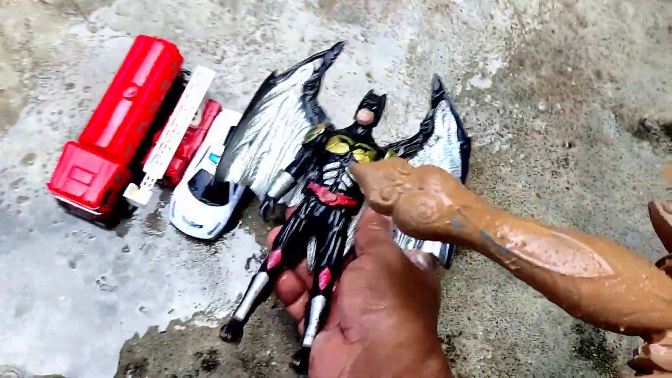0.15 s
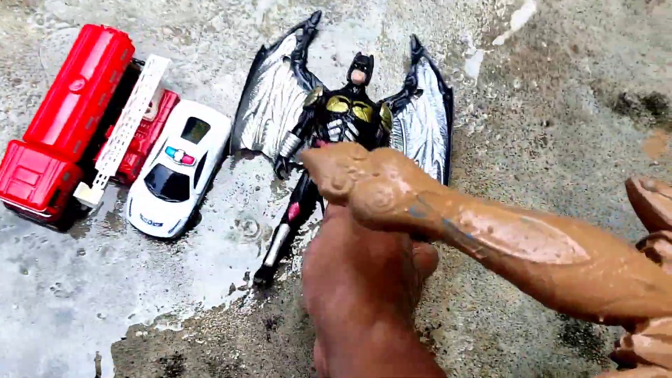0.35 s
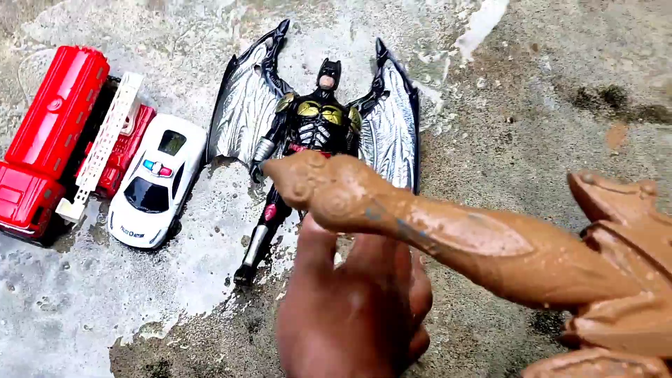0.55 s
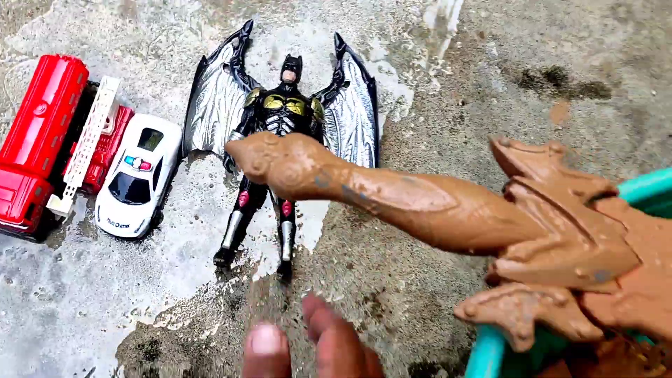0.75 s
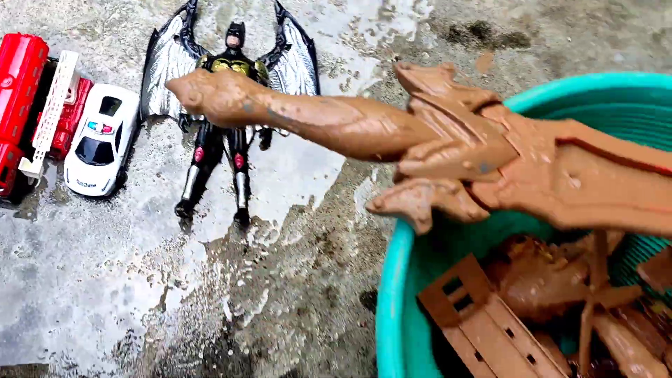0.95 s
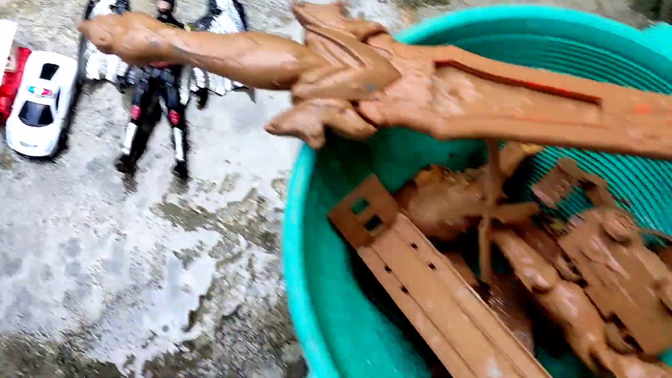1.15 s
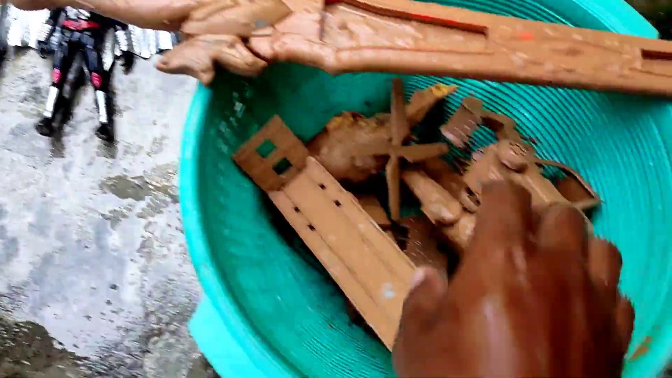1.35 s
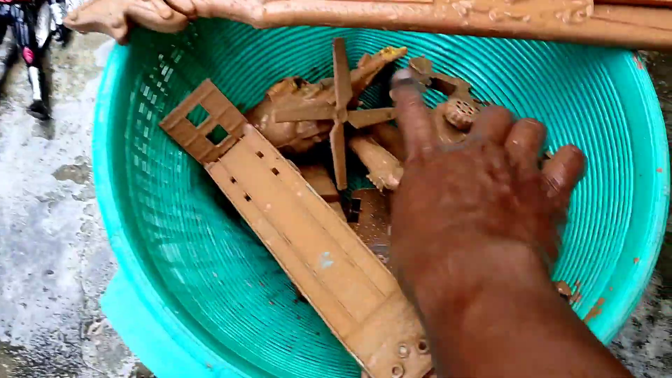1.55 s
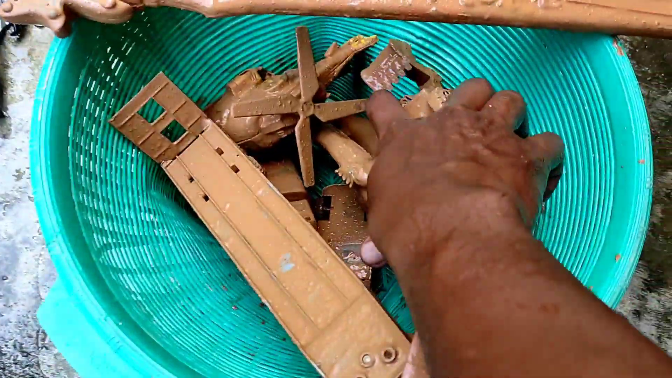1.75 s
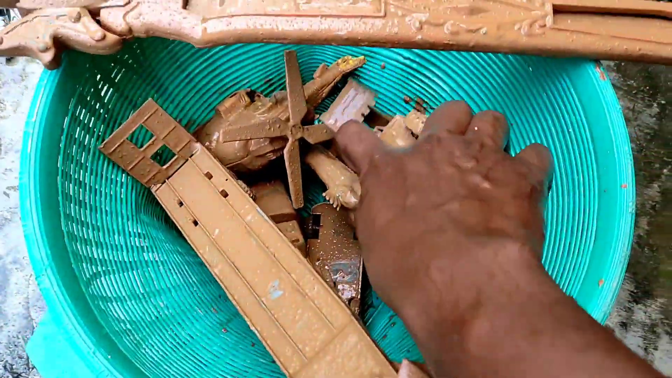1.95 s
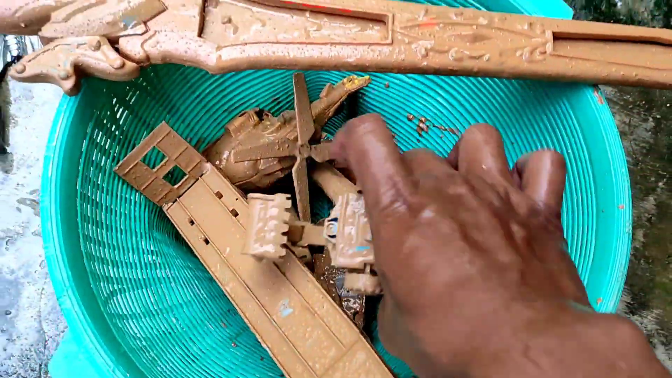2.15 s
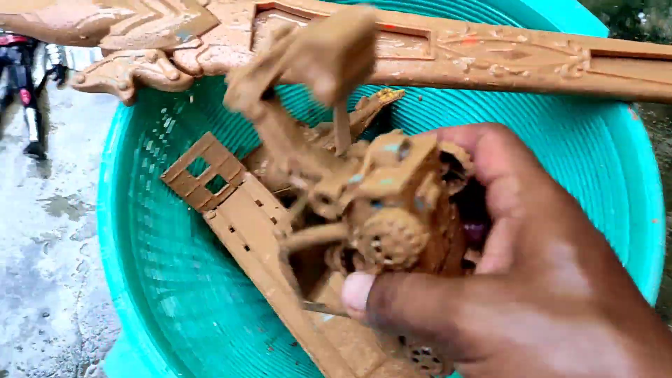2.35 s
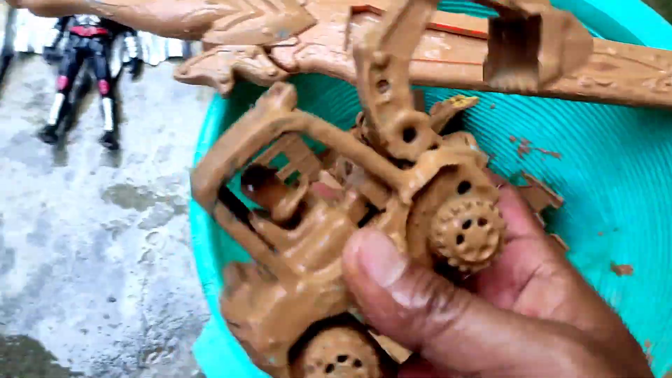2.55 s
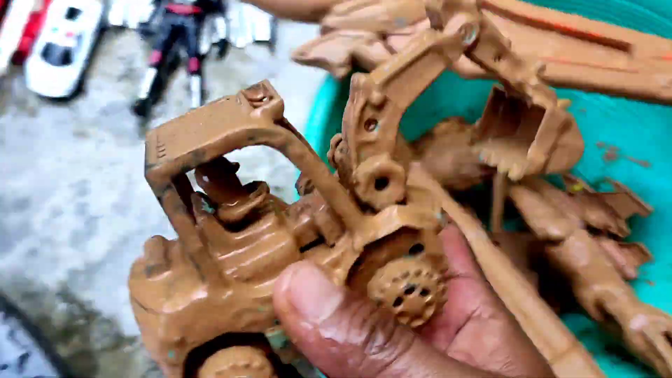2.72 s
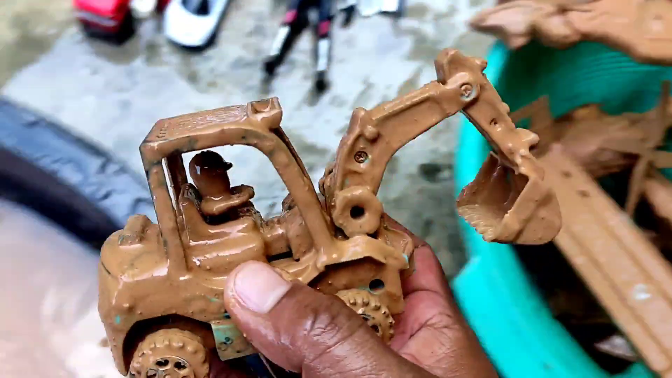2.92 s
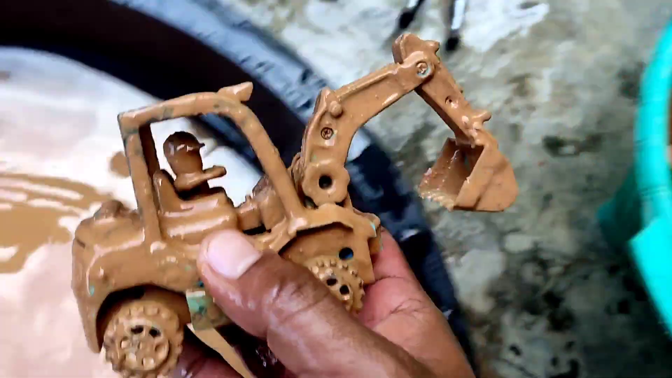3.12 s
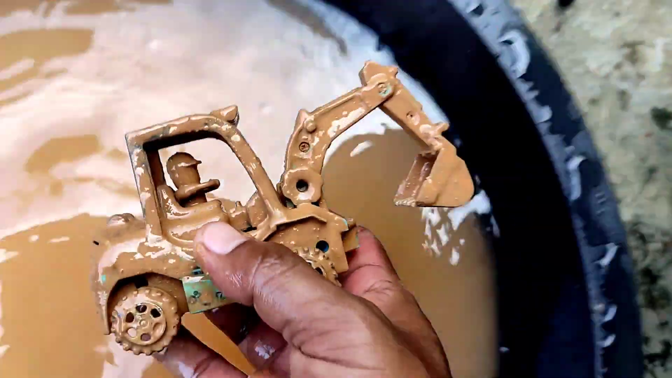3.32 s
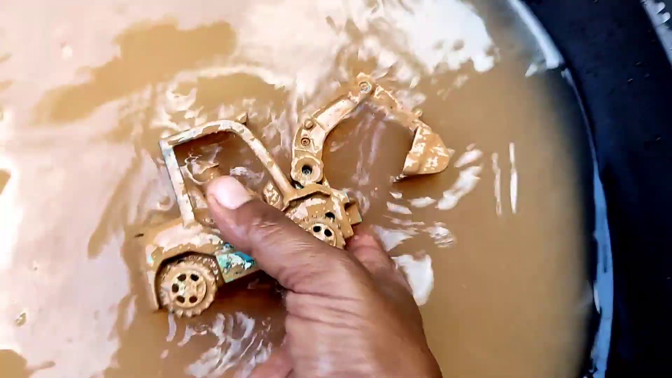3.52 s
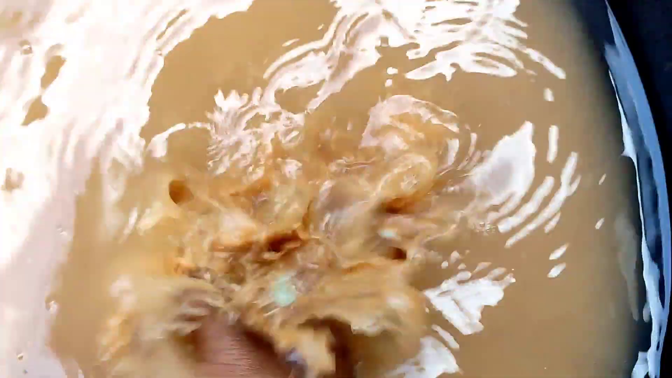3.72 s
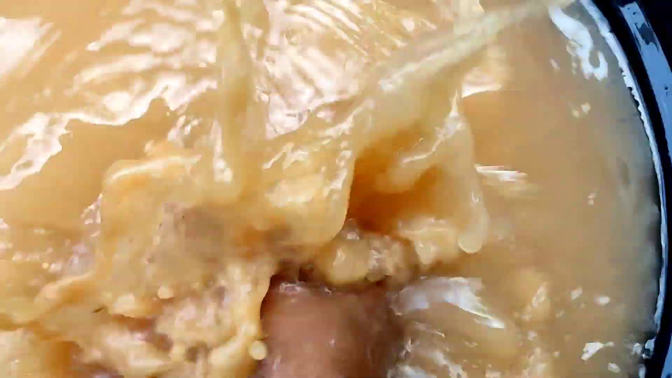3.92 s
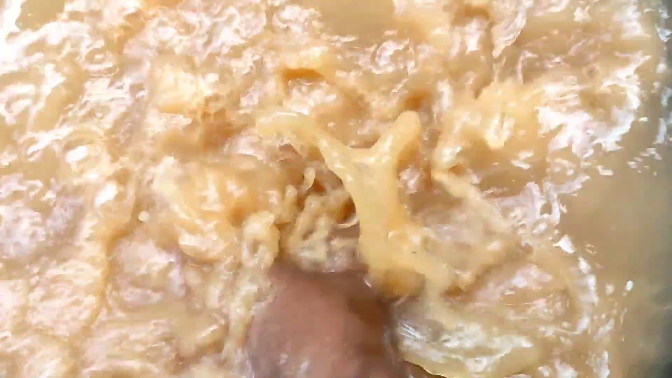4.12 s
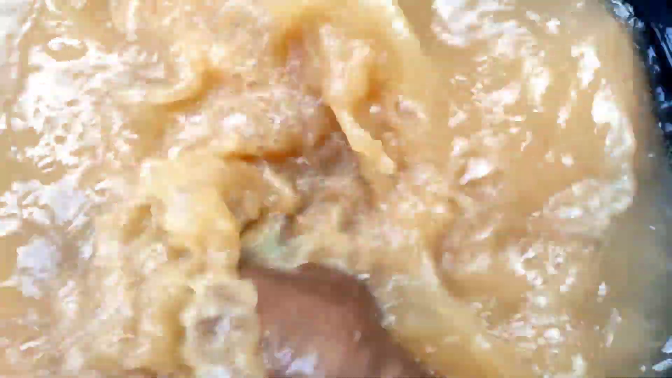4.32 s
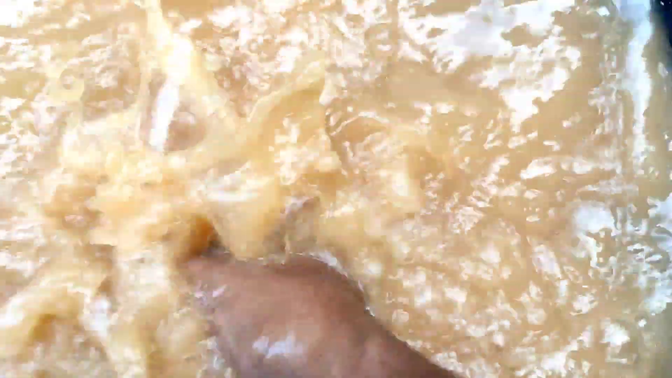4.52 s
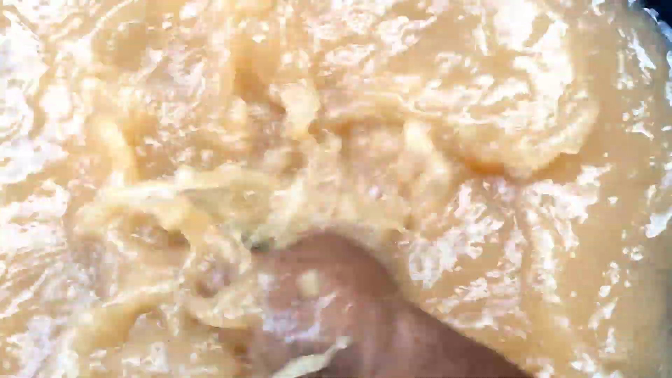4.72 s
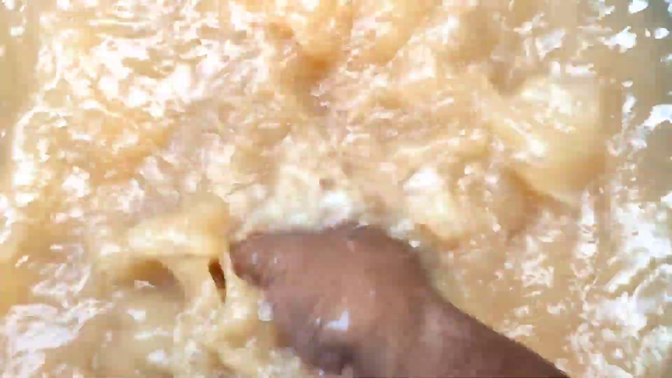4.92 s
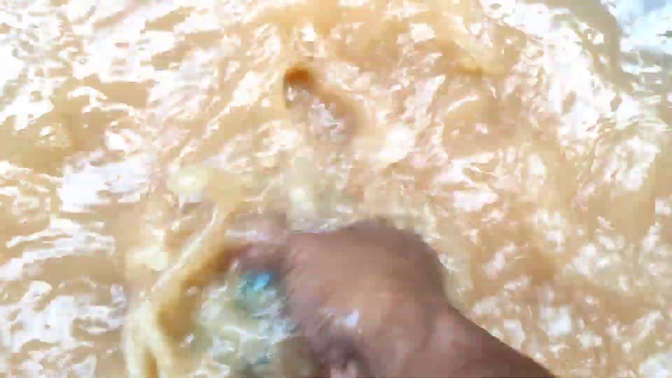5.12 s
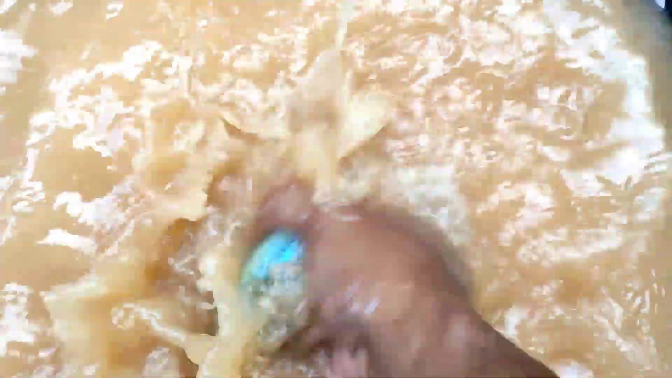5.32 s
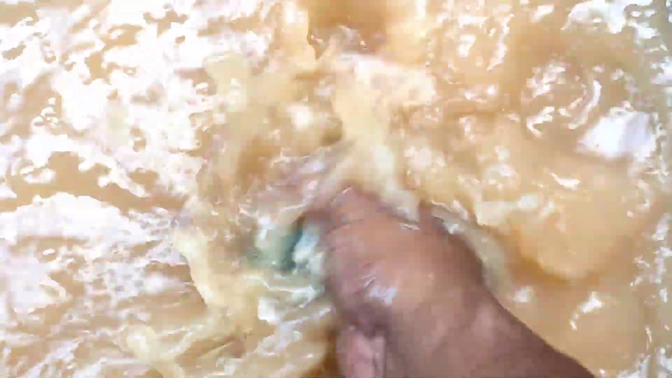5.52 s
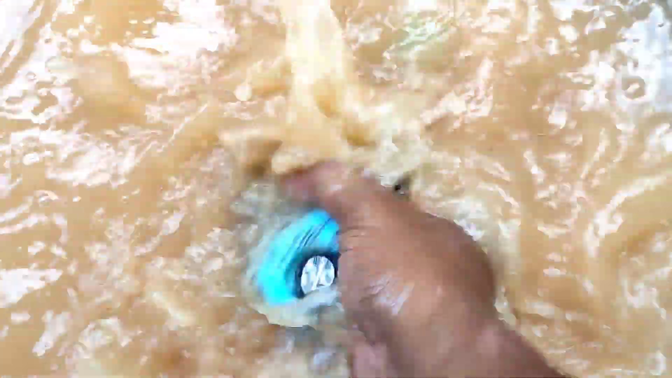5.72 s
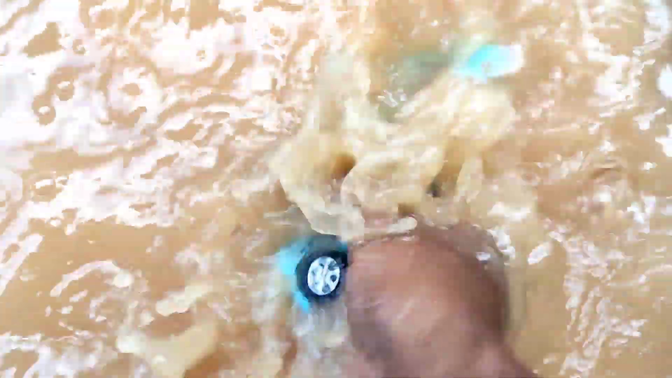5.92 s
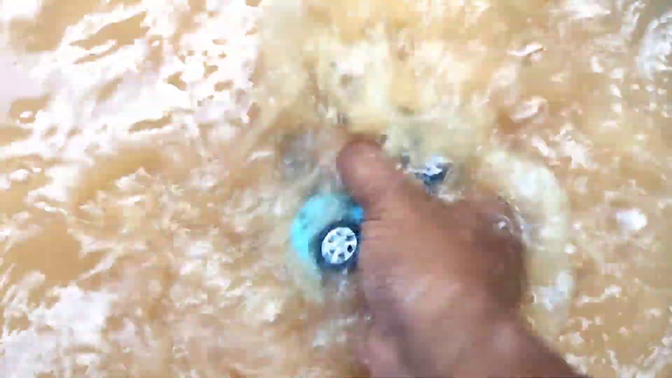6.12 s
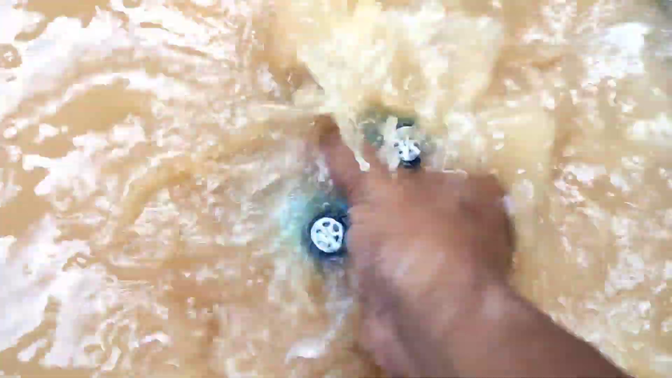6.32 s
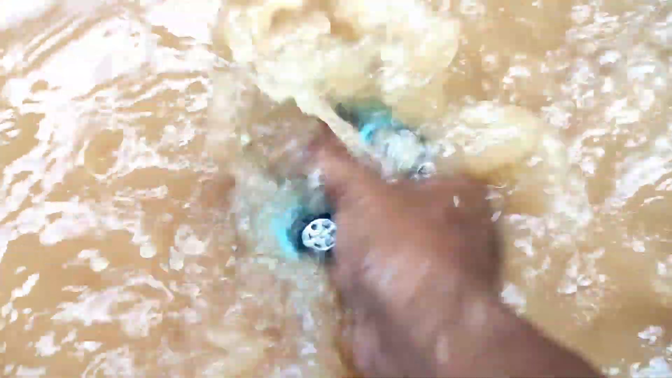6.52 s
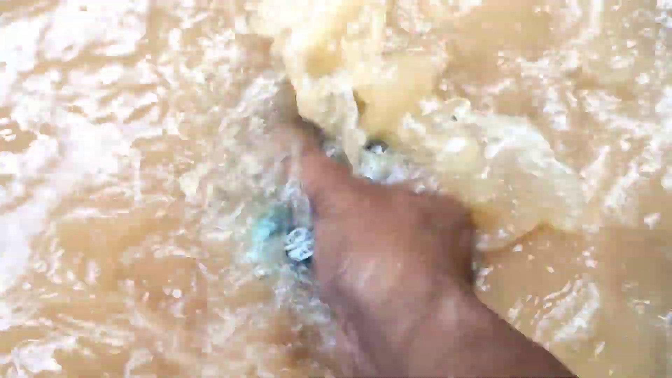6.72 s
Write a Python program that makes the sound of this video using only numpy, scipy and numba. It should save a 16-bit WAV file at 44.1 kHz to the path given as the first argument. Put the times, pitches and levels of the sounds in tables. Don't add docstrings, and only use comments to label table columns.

```python
import sys
import numpy as np
from scipy import signal
from scipy.fft import rfft, irfft, next_fast_len
from scipy.io import wavfile
from scipy.ndimage import uniform_filter1d
from numba import njit

SR = 44100
rng = np.random.default_rng(int(sys.argv[2]) if len(sys.argv) > 2 else 0)


def convert_level_to_amplitude(level_db):
    exponent = np.asarray(level_db, float) / 20
    return 10 ** exponent


def to_wav(s):
    ch = np.atleast_2d(s).T
    pcm = np.round(np.clip(ch, -1, 1) * 32767)
    wavfile.write(sys.argv[1], SR, pcm.astype(np.int16))


N = 298116

# frequency in Hz, level in dB.
YARD_SPECTRUM = [(40, 4.5), (110, 8), (260, 0.5), (420, -8.5), (800, -14.5), (2000, -16.5), (5000, -14.5),
                 (15000, -28.5)]
# start in seconds, length in seconds, level in dB.
BUMPS = [(1.037, 0.085, -51), (1.56, 0.25, -55), (2.618, 0.034, -48), (2.77, 0.24, -52.5),
         (3.88, 0.18, -51), (4.2, 0.047, -52), (4.823, 0.036, -55), (5.19, 0.039, -63), (5.882, 0.12, -50),
         (6.112, 0.039, -48), (6.26, 0.085, -58), (6.69, .08, -48)]
# start in seconds, length in seconds, scrape level in dB,
# hollow rumble in dB relative to the scrape, fine grit in dB relative to the scrape.
RUBS = [(0.014, 0.28, -53, 1.5, -6), (0.383, 0.24, -56, 5, -5), (0.734, 0.47, -58, -7, -4),
        (1.205, .27, -39, -12, -2), (1.272, 0.06, -41.5, -26, -4), (1.363, 0.072, -36, -37, -7),
        (1.657, 0.18, -60, 13, 3), (1.895, .04, -59.5, 15.5, 6), (1.959, 0.12, -47, 5, -6),
        (2.131, 0.098, -44.5, 7.5, -3.5), (2.272, 0.23, -52.5, -3, -4), (2.527, 0.21, -55.5, -0.5, 0.5),
        (3.277, 0.056, -67, -11, 10), (3.37, 0.25, -56.5, -0.5, -8), (3.7, 0.15, -46.5, -2, -11)]
DRAG_S = (1.15, 1.58)
# resonance in Hz, width in Hz, level in dB.
SHELL = [(686, 100, -18), (1120., 1000, 8)]
# resonance in Hz, width in Hz, level in dB.
BASKET = [(1720., 160, 12.5), (2500., 510, 0.5)]
# resonance in Hz, width in Hz, level in dB.
HOLLOWS = [(440, 100, 5), (710, 81, 7)]
# start in seconds, length in seconds, level in dB.
WING_RUSTLE = [
    (0.068, 0.222, -57),
]
# start in seconds, peak in dB, pitch in
# Hz, t60 in seconds.
CATCHES = [(0.474, -20, 3020, 0.0077), (0.5083, -17, 3040, 0.012), (1.936, -29, 791, 0.024),
           (1.972, -30, 694, 0.032), (1.989, -34, 1140, 0.057), (2.003, -34, 1140, 0.048),
           (2.012, -40, 3700, .02), (2.022, -25, 740, 0.024), (2.038, -30, 1120, 0.044),
           (2.052, -33, 1090, .03), (2.093, -32, 2700, 0.013), (2.15, -31, 1720, 0.027),
           (2.166, -25, 737, 0.047), (2.185, -25, 690, 0.033), (2.204, -23, 745, 0.03),
           (2.213, -25, 470, 0.035), (2.212, -36, 3840, .025), (2.214, -28.5, 2320, 0.021),
           (2.325, -32, 400, 0.11), (2.777, -22, 2100, 0.013), (2.56, -31.5, 526, 0.036),
           (2.585, -33, 3000, .01), (3.622, -13, 3060, .01), (3.586, -29, 4020, 0.023),
           (3.671, -11, 2500, 0.015)]
# start in seconds, length in seconds, level in dB.
HUM = [
    (0.082, 0.2, -43.5),
    (3.082, 0.2, -48.5),
    (3.501, 0.33, -43),
]
# start in seconds, peak in dB, ring in Hz,
# thin wings in dB relative to the ring, crack in dB relative to the ring.
FIGURE_KNOCKS = [(0.36, -23, 1570, -10, -6), (0.3683, -8.5, 1530, -7, -2.5), (0.3819, -12.5, 1480, 2, -19),
                 (0.4105, -25, 1550, 1, -15), (0.433, -28, 1540, -16, -14), (0.455, -38, 1650, 4, -18),
                 (0.4701, -24.5, 1580, 13, -6.5), (0.4747, -22, 1560, 5, -21), (0.508, -33, 1760, 7, -14),
                 (0.545, -42, 1340, 6, -20), (0.581, -32, 1630, 4, -24)]
# start in seconds, peak in dB, ring in Hz,
# thud in dB relative to the ring, crack in dB relative to the ring.
TOY_KNOCKS = [(1.3929, -11.5, 1710, -32, -20.5), (1.427, -5.5, 1666, -44, -38),
              (1.458, -15.5, 1660, -35, -34), (2.093, -19, 1184, -11, -22), (2.141, -36, 1600, -6, -9),
              (2.187, -37, 1500, 9, -16), (2.3073, -26, 1700, -3, -23), (2.558, -18.5, 1670, -17.5, -13),
              (2.6093, -44.5, 1760, -17, 5.5), (2.6872, -27, 1750, -3, -27), (2.705, -31, 1675, -22, -11),
              (2.771, -33.5, 1720, -4, -6), (2.7797, -14.5, 1630, -4.5, -24.5)]
# start in seconds, peak in dB, t60 in seconds.
TICKS = [
    (0.4697, -15, 0.011),
    (0.475, -15, 0.0084),
    (0.5085, -14.5, 0.0095),
    (1.7595, -39, .03),
    (1.917, -36, 0.037),
    (2.09, -30.5, .015),
    (2.142, -33, .03),
    (2.209, -31, .03),
]
# start in seconds, peak in dB.
POPS = [(0.5082, -19), (4.206, -13), (4.745, -14), (4.8438, -10), (4.8715, -10), (5.231, -13), (5.476, -6),
        (5.937, -8), (6.1235, -4), (6.157, -6), (6.2505, -10), (6.5313, -8.5), (6.57, -11.5)]
# start in seconds, peak in dB, pitch in Hz, spray in dB.
DRIPS = [
    (3.558, -30, 595, -16.5),
    (3.588, -34, 1730, -19),
    (3.602, -19, 3500, -31),
    (3.622, -20, 1740, -10),
    (3.637, -21, 1750, -18),
    (3.653, -12.5, 2140, -13),
    (3.673, -12.5, 620, -26),
    (3.697, -21, 1750, -17),
    (3.706, -31, 1880, -14),
]
# start in seconds, peak in dB, t60 in seconds.
SPATTER = [
    (3.579, -26, 0.038),
    (3.593, -25, 0.034),
    (3.648, -28, .01),
    (3.667, -18, 0.012),
    (3.673, -25, 0.0095),
    (3.681, -31, 0.013),
]
# start in seconds, length in seconds, level in dB.
TRICKLE = [
    (3.565, 0.14, -37.5),
]
# time in seconds, effort in dB, air dragged under in dB.
STIR = [
    (3.834, -39, -8),
    (3.89, -23, -2),
    (4.02, -21.5, 0.5),
    (4.09, -24.5, -3.5),
    (4.56, -25, -2),
    (5.0, -28, -2),
    (5.32, -31.5, -2.5),
    (5.97, -22, -11.5),
    (6.2, -22, 1.5),
    (6.76, -24, 3.5),
]
# start in seconds, peak in dB, t60 in seconds.
SLAPS = [(3.818, -39, .015), (3.8358, -4, .05), (3.857, -7, 0.16), (3.9094, -3, 0.2), (3.9768, -12, 0.032),
         (4.037, -7.5, 0.059), (4.146, -6, 0.018), (4.1754, -23, 0.018), (4.204, -10, 0.015),
         (4.295, -14, 0.37), (4.334, -9, 0.11), (4.432, -18, 0.18), (4.5048, -5.5, 0.093),
         (4.701, -13, 0.13), (4.8423, -4, 0.038), (5.0758, -13, 0.02), (4.782, -16.5, 0.096),
         (4.911, -23, 0.024), (5.003, -16, 0.19), (5.151, -18, 0.019), (5.484, -22, 0.022),
         (5.205, -13, 0.013), (5.2306, -10, 0.18), (5.412, -8, 0.017), (5.441, -9.5, 0.06),
         (5.4638, -10.5, 0.081), (5.621, -7, 0.05), (5.643, -10.5, 0.032), (5.799, -10, 0.06),
         (5.82, -6, 0.074), (5.928, -10, 0.095), (5.999, -11.5, 0.076), (6.1207, -9.5, 0.21),
         (6.252, -15, 0.27), (6.39, -13, 0.14), (6.506, -16, 0.14), (6.61, -15.5, 0.22),
         (6.737, -7.5, 0.52)]
# time in seconds, level in dB.
HISS = [
    (3.84, -45),
    (4.6, -40),
    (5.3, -47.5),
    (5.55, -37),
    (5.95, -43.5),
    (6.3, -35.5),
    (6.76, -42),
]
# start in seconds, peak in dB, pitch
# in Hz.
BUBBLE_CLUSTERS = [
    (3.837, -3.5, 1520),
    (3.847, -3.5, 1440),
    (3.897, -4.5, 1120),
    (3.926, 3.5, 1190),
    (3.964, -7, 1080),
    (4.032, 9, 1880),
    (4.042, 6, 1130),
    (4.11, -9, 1080),
    (4.151, 3, 1640),
    (4.206, -10, 1620),
                   (4.237, -5, 1520), (4.292, -7, 1080), (4.43, 2.5, 1770), (4.499, 1.5, 1780), (4.586, 2.5, 1800),
           (4.623, -8, 1270), (4.642, 7, 1230), (4.871, -15, 1080), (4.963, -12, 1770), (5.001, 4, 1750),
           (5.037, 1, 1840), (5.216, -5, 2470), (5.424, -19, 1220), (5.476, 5, 1590), (5.558, -4, 1890),
           (5.617, 0, 1400), (5.743, 5, 1490), (5.8, 5, 1800), (5.905, 0.5, 1720), (5.936, -4, 1090),
           (5.991, 7.5, 1720), (6.124, 5.5, 1700), (6.153, -3, 1870), (6.25, -1.5, 746), (6.36, 0, 1080),
           (6.435, -1, 1660), (6.505, -13, 1750), (6.531, -5, 1080), (6.57, -6, 1470), (6.724, 5, 1670)]
# start in seconds, peak in dB, pitch in Hz.
BLIPS = [(3.8392, -13, 2400), (3.9153, -13, 2770), (3.9785, -18, 2180), (4.0355, -6, 2060),
         (4.1496, -14, 2120), (4.2055, -18, 2040), (4.257, -15, 2540), (4.4315, -18, 2780),
         (4.6295, -19, 2100), (4.6864, -18.5, 3830), (4.781, -26, 2000), (5.0007, -12, 2200),
         (5.2157, -14, 2240), (5.2476, -20, 2380), (5.413, -28, 2320), (5.5948, -11, 2090),
         (5.735, -11.5, 2400), (5.8024, -18, 2440), (5.9281, -15, 2430), (5.9984, -12, 2350),
         (6.1227, -13, 2600), (6.155, -7, 2400), (6.2658, -16, 3480), (6.38, -18, 2570),
         (6.415, -15.5, 2540), (6.5055, -16, 2500)]
# start in seconds, peak in dB, pitch in Hz, t60 in seconds.
GULPS = [(3.919, -10.5, 512, 0.19), (3.945, -25, 625, 0.04), (4.143, -17, 616, 0.11),
         (4.214, -15, 420, 0.075), (4.503, 4, 377, 0.022), (4.616, -20, 394, 0.061),
         (4.741, -8, 387, 0.039), (4.842, -3, 409, 0.041), (4.878, -15, 312, 0.071),
         (5.033, -2.5, 389, 0.06), (5.694, -13, 390, 0.042), (5.792, -17, 433, 0.075),
         (5.932, -7, 414, 0.028), (5.96, -8, 460, 0.046), (6.06, -15, 415, 0.13), (6.122, -5.5, 574, 0.039),
         (6.186, 1.5, 290, 0.08), (6.299, 1.5, 429, 0.041), (6.441, -8, 294, 0.079),
         (6.528, -20, 680, 0.075), (6.61, -11, 414, 0.061), (6.636, -0.5, 385, 0.11),
         (6.19, -2.5, 400, 0.14), (6.329, 0, 274, 0.064), (6.265, -10, 770, 0.049), (6.491, -6, 400, 0.055),
         (6.75, -13, 400, 0.04), (4.32, -19, 298, 0.062), (5.045, -5.5, 564, 0.031), (6.617, -5, 564, 0.06)]
# start in seconds, peak in dB, pitch in Hz, t60 in seconds,
# glide in octaves per second, length in seconds.
PLUNGE = [
    (3.937, -6.5, 419, 0.33, 43, .04),
]
# start in seconds, peak in dB, pitch in Hz.
LONE_BUBBLES = [(4.165, 0, 1640), (4.208, -3, 1630), (4.313, -0.5, 1800), (4.337, -10, 1460),
                (4.369, -8, 1070), (4.441, -3.5, 1520), (4.562, -1.5, 1750), (4.704, -6, 1840),
                (4.726, -8, 1160), (4.745, -12.5, 700), (4.788, -17, 1670), (4.806, -12, 1380),
                (4.872, -9, 1080), (4.893, -10, 1720), (4.6425, 3, 1230), (4.054, 0, 1800),
                (4.984, -5.5, 1750), (5.121, -15, 800), (5.141, -13, 1460), (5.178, -24, 746),
                (5.232, -11, 1720), (5.304, -5, 1800), (3.983, -3, 1550), (5.4247, -6.5, 1190),
                (5.462, -5, 1730), (5.482, 5, 1750), (5.537, -4, 1850), (5.571, 3.5, 1770),
                (5.598, -11, 1340), (5.659, -4, 1700), (5.692, -6, 1760), (5.729, -10, 1570),
                (5.825, -2, 1840), (5.843, -13, 1080), (5.88, -8, 1760), (5.906, -3, 1700),
                (5.936, -5, 1040), (6.011, -3, 1460), (6.068, -2, 1700), (6.11, -5, 1350),
                (6.146, -5, 1720), (6.233, -8.5, 683), (6.269, -3, 783), (6.479, -18, 1720),
                (6.505, -6, 1750), (6.532, -15, 1060), (6.628, -10, 710), (6.643, -10, 1200)]
# resonance or dip in Hz, width in Hz, level in dB.
TUB = [(278.4, 28, 6.5), (396, 36, 9), (517, 66, -3.5), (620, 420, -3.5), (912, 420, -8.5), (1045, 400, 8)]
# resonance or dip in Hz, width in Hz, level in dB.
LEFT_PORT = [(92, 42, 4.5), (1400, 190, 6), (1750, 144, 13), (6430, 7800, -6.5), (12400, 390, 3)]
# resonance or dip in Hz, width in Hz, level in dB.
RIGHT_PORT = [(7350, 1200, -4.5), (9020, 890, 10), (11050, 360, -44)]
# frequency in Hz, threshold in dB against the neighbours.
THINNING = [(1500, -10.), (2300, -3.2), (3200, -1.4), (6000, -.4), (9000, -.6), (12000, .6), (15000, .9)]

TUB_T60_S = 0.075


def response(hz, modes):
    gain = np.ones(np.shape(hz), complex)
    for centre_hz, width_hz, db in modes:
        detune, loss = centre_hz ** 2 - hz ** 2, 1j * hz * width_hz
        gain = gain * (detune + loss * convert_level_to_amplitude(db)) / (detune + loss)
    return gain


def colour(x, gain_at):
    size = next_fast_len(N + SR // 4)
    hz = np.arange(size // 2 + 1) * SR / size + 1
    return irfft(rfft(x, size) * gain_at(hz), size)[..., :N]


def through(x, modes):
    return colour(x, lambda hz: response(hz, modes))


def ports(hz):
    return np.array([response(hz, LEFT_PORT), response(hz, RIGHT_PORT)])


def band(lo_hz, hi_hz):
    return lambda hz: 1 / (1 + lo_hz / (1j * hz)) ** 2 / (1 + 1j * hz / hi_hz) ** 2


def unit(x):
    return x / np.sqrt(np.mean(colour(x, ports).mean(axis=0) ** 2))


def noise_band(lo_hz, hi_hz):
    return unit(colour(rng.standard_normal((2, N)), band(lo_hz, hi_hz)))


def curves(table):
    s, *columns = np.transpose(np.vstack(table))
    return [np.interp(np.arange(N) / SR, s, c, left=-99) for c in columns]


def walk(rate):
    k = int(SR / rate)
    return 1.34 * uniform_filter1d(np.repeat(rng.standard_normal(N // k + 1), k), k)[:N]


@njit
def ring(s, size, hz, t60, glide, rise, length):
    out = np.zeros((2, N))
    for k in range(len(hz)):
        fade = 1000. ** (-1 / (t60[k] * SR))
        swell = np.exp(-1 / (rise[k] * SR))
        bend = 2 ** (glide[k] / SR)
        for c in range(2):
            i0 = int(s[c, k] * SR) + 1
            step = 2 * np.pi * hz[k] / SR
            phase, a, b = step * (i0 - s[c, k] * SR), size[c, k], 1.
            for i in range(max(i0, 0), min(i0 + int(length[k] * SR), N)):
                b *= swell
                out[c, i] += a * (1 - b) * np.sin(phase)
                a, step = a * fade, min(step * bend, 2.6)
                phase += step
    return out


def grains(s, db, hz, t60, glide=0., rise_cycles=0.48, spread_s=0.000067, pan_db=0.0, length=None):
    spot = rng.standard_normal((len(s), 2)).T
    side = np.array([[.5], [-.5]])
    every = np.ones(len(s))
    start = s + side * (0.00013 + spread_s * spot[0])
    size = convert_level_to_amplitude(db + side * pan_db * spot[1])
    length = t60 if length is None else length
    return ring(start, size, hz * every, t60 * every, glide * every, rise_cycles / hz * every, length * every)


def swarm(rate, lo_hz, hi_hz, cycles, scatter_db, bend=0., spread_s=0.0001916, rise_cycles=6.2):
    u = rng.random((int(rate * N / SR), 4)).T
    hz = lo_hz * (hi_hz / lo_hz) ** u[1]
    t60 = cycles * (.5 + u[3]) / hz
    db = -scatter_db * np.log(1 - .95 * u[2])
    return grains(u[0] * N / SR, db, hz, t60, bend / t60, rise_cycles, spread_s)


def cluster(s, db, hz, count, during_s, scatter, below_db):
    u = rng.random((len(s), count, 3))
    u[:, 0] = 0
    starts = s[:, None] + during_s * u[..., 0]
    levels = db[:, None] - below_db * np.sqrt(u[..., 1])
    octaves = scatter * (u[..., 2] - .5 * np.sign(u[..., 2]))
    return starts.ravel(), levels.ravel(), (hz[:, None] * 2 ** octaves).ravel()


def heard(db, hz, modes=()):
    return db - 20 * np.log10(np.abs(response(hz, modes)) * np.abs(ports(hz)).mean(axis=0))


def bursts(s, db, t60, attack_s):
    out, t, every = np.zeros(N), np.arange(SR // 4) / SR, np.ones(len(s))
    for start, size, fall, rise in zip((s * SR).astype(int), convert_level_to_amplitude(db), t60 * every, attack_s * every):
        shape = size * (1 - np.exp(-t / rise)) * convert_level_to_amplitude(-60 * t / fall)
        out[start:start + len(t)] += shape[:N - start]
    return out


def strokes(s, length, db, attack_s, release_s):
    t = np.arange(N) / SR
    out = np.zeros(N)
    for a, n, d in zip(s, np.maximum(length, attack_s), db):
        corners = [a - attack_s / 2, a + attack_s / 2, a + n, a + n + release_s]
        out += convert_level_to_amplitude(d) * np.interp(t, corners, [0, 1, 1, 0]) ** 2
    return out


def walls(x, t60, wet_db, early_s):
    t = np.arange(int(.3 * SR)) / SR
    tail = rng.standard_normal((3, len(t))) * convert_level_to_amplitude(-60 * t / t60) * (1 - np.exp(-t / early_s))
    tail = tail / np.sqrt((tail ** 2).sum(axis=1, keepdims=True))
    x = colour(x, band(158.0, 31500.0))
    low = colour(x, lambda hz: 1 / (1 + (hz / 1300) ** 4))
    wet = signal.fftconvolve(low, tail[:1], axes=1) + signal.fftconvolve(x - low, tail[1:], axes=1)
    return x + convert_level_to_amplitude(wet_db) * wet[:, :N]


def tub_walls(x):
    return walls(x, TUB_T60_S, -5.0, 0.00062)


def yard_walls(x):
    return walls(x, 0.066, -9.5, 0.0044)


def yard():
    hz_points, db_points = np.transpose(YARD_SPECTRUM)
    shade = lambda hz: convert_level_to_amplitude(np.interp(np.log(hz), np.log(hz_points), db_points))
    common, left, right = rng.standard_normal((3, N))
    shared = colour(common, lambda hz: shade(hz) * 1.64 * band(200., 900.)(hz))
    air = unit(colour(np.array([left, right]), shade) + 1.33 * shared)
    low = colour(air, lambda hz: 1 / (1 + (hz / 190) ** 6))
    low = low + 0.14 * low[::-1]
    low = colour(low, lambda hz: band(45.0, 9000.)(hz) / (1 + (48 / hz) ** 4))
    high = colour(air, lambda hz: 1 / (1 + (190 / hz) ** 6))
    bumps = strokes(*np.transpose(BUMPS), 0.035, 0.023)
    rumble = unit(low) * (convert_level_to_amplitude(-57) + bumps) * convert_level_to_amplitude(2.2 * walk(13))
    return rumble + unit(high) * convert_level_to_amplitude(-51 + walk(4.4) + walk(11))


def rubbing():
    s, length, db, hollow_db, grit_db = np.transpose(RUBS)
    moves = lambda share_db: strokes(s, length, db + share_db, 0.053, 0.052)
    slips = convert_level_to_amplitude(2.2 * walk(90))
    clicks = swarm(4000, 994.0, 2700.0, 7.1, 0.97) * slips
    toy, basket = unit(through(clicks, SHELL)), unit(through(clicks, BASKET))
    sample = np.arange(N)
    dragging = (sample > DRAG_S[0] * SR) & (sample < DRAG_S[1] * SR)
    scrape = np.where(dragging, basket, toy)
    hollow = unit(through(swarm(900, 342.0, 1280.0, 3.0, 3.3) * slips, HOLLOWS))
    grit = unit(swarm(8900, 2160.0, 14800.0, 4.7, 1.8))
    return walls(moves(0) * scrape + moves(hollow_db) * hollow + moves(grit_db) * grit, 0.11, -9.5, 0.0023)


def catches():
    s, db, hz, t60 = np.transpose(CATCHES)
    rustle = unit(swarm(1900, 2600.0, 3370.0, 14.0, 3.)) * strokes(*np.transpose(WING_RUSTLE), 0.068, 0.047)
    snaps = grains(s - .001, heard(db + 2.5, hz), hz, t60, rise_cycles=1.6)
    return walls(snaps + rustle, 0.072, -12.0, .004)


def humming():
    column = lambda hz: band(200., 400.)(hz) * response(hz, [(273.0, 11.6, 33.0)])
    hum = unit(colour(rng.standard_normal(N), column) * np.ones((2, 1)))
    return hum * strokes(*np.transpose(HUM), 0.066, 0.023)


def knocks():
    figure = [(s, db, hz, -7, wing, crack) for s, db, hz, wing, crack in FIGURE_KNOCKS]
    toys = [(s, db, hz, thud, -37, crack) for s, db, hz, thud, crack in TOY_KNOCKS]
    s, db, hz, thud_db, wing_db, crack_db = np.transpose(figure + toys)
    out = grains(s - .002, heard(db + 4.5, hz), hz, 0.021, rise_cycles=2.5)
    modes = [(400., 0.029, thud_db), (680., 0.029, thud_db), (1080., 0.021, thud_db),
             (2420.0, 0.0052, wing_db), (2900.0, 0.013, wing_db), (3480.0, 0.0066, wing_db),
             (5000., .005, wing_db - 12)]
    for mode_hz, t60, share_db in modes:
        struck_hz = mode_hz * (1 + 0.055 * rng.standard_normal(len(s)))
        out = out + grains(s - .001, db + share_db + 2.5, struck_hz, t60, rise_cycles=1.47)
    snap = bursts(s - .001, db + crack_db + 6.5, 0.023, 0.0017)
    after = bursts(s, db + crack_db - 17.5, 0.18, 0.0037)
    return walls(out + noise_band(2400.0, 4800.0) * (snap + after), 0.11, -9.5, 0.0023)


def ticks():
    s, db, t60 = np.transpose(TICKS)
    noise = rng.standard_normal(N) + 0.47 * rng.standard_normal((2, N))
    return yard_walls(bursts(s, db - 4.0, t60, 0.00039) * unit(colour(noise, band(1500.0, 3100.0))))


def pops():
    s, db = np.transpose(POPS)
    hz = 1900 * 2 ** (.3 * rng.standard_normal(len(s)))
    return yard_walls(grains(s - .0003, db + 9., hz, .004, rise_cycles=.15))


def drips():
    s, db, hz, spray_db = np.transpose(DRIPS)
    plops = grains(s + 0.00045, heard(db + 9.0, hz), hz * 1.031, 0.013, -10.5, 3.2)
    landings = [(start, level, 0.016) for start, level in zip(s, spray_db)]
    s, db, t60 = np.transpose(SPATTER + landings)
    return plops + yard_walls(bursts(s, db - 2.5, t60, 0.0014) * noise_band(1740.0, 9150.0))


def churning():
    shake, air = convert_level_to_amplitude(curves(STIR))
    s, db, _ = np.transpose(SLAPS)
    surge = bursts(s, db + 9.5, 0.083, 0.0039)
    stir = shake * (1 + surge) + strokes(*np.transpose(TRICKLE), 0.13, 0.097)
    churn = swarm(900, 472.6, 2534.0, 17.4, 2.24, bend=0.33, rise_cycles=1.63) * convert_level_to_amplitude(2.67 * walk(45))
    gulp = swarm(260, 238.0, 795.0, 9., 2.4, bend=0.21, spread_s=.00005)
    bubbling = convert_level_to_amplitude(-1.5) * unit(through(churn, TUB))
    gulping = np.maximum(air, .3) * convert_level_to_amplitude(-7) * unit(through(gulp, TUB))
    return tub_walls(stir * (bubbling + gulping))


def spray():
    fizz = unit(swarm(4000, 2218.0, 15370.0, 14.0, 3.6, bend=0.15, rise_cycles=1.0)) * convert_level_to_amplitude(2.4 * walk(40))
    mist = noise_band(2300.0, 9000.)
    s, db, t60 = np.transpose(SLAPS)
    cracks = bursts(s, db - 2.5, 0.0094, 0.0016) * mist
    swell_s = .16 * t60
    showers = bursts(s - swell_s / 2, db - 10., t60, 0.004 + 1.38 * swell_s) * (1.45 * fizz + 0.5 * mist)
    steady = convert_level_to_amplitude(curves(STIR)[0] - 14.5 + 0.55 * walk(16)) * (fizz + 0.5 * mist)
    return tub_walls(steady + showers) + cracks


def wash():
    sheet = swarm(3500, 596.4, 3400., 28.7, 2.6, bend=0.53, rise_cycles=8.7)
    sheet = unit(colour(sheet, lambda hz: response(hz, TUB) * band(300., 2600.)(hz)))
    sheet = sheet * convert_level_to_amplitude(curves(STIR)[0] - 10.5 + 0.84 * walk(11))
    return sheet + noise_band(2000., 8500.0) * convert_level_to_amplitude(curves(HISS)[0] + 1.8 * walk(8.7))


def bubble_clusters():
    s, db, hz = np.transpose(BUBBLE_CLUSTERS)
    s, db, hz = cluster(s, db, hz, count=4, during_s=0.012, scatter=0.8, below_db=15.5)
    rings = grains(s - .0015, heard(db + 6.0, hz, TUB), 0.963 * hz, 16.0 / hz, 14.0, 3.76, .0001)
    return tub_walls(through(rings, TUB))


def blips():
    s, db, hz = np.transpose(BLIPS)
    return yard_walls(grains(s - .001, heard(db + 4., hz), hz, 26. / hz, 12., 2.5, .0001))


def air_pockets():
    s, db, hz, t60 = np.transpose(GULPS)
    gulps = grains(s - .004, heard(db - 4.5, hz, TUB), .95 * hz, t60, 1.5, 0.35, .00004, 0.27)
    s, db, hz, t60, glide, length = np.transpose(PLUNGE)
    cavity = grains(s, db, hz, t60, glide, 1.1, .00004, 0.87, length)
    cavity = cavity * convert_level_to_amplitude(4 * walk(150) - 4)
    return tub_walls(through(gulps + cavity, TUB))


def lone_bubbles():
    s, db, hz = np.transpose(LONE_BUBBLES)
    rings = grains(s - .0015, heard(db + 1, hz, TUB), 0.99 * hz, 21 / hz, 7.2, 2.13, .0001)
    return walls(through(rings, TUB), TUB_T60_S, -1.5, 0.001)


def scene():
    plastic = rubbing() + catches() + humming() + knocks() + ticks() + pops()
    water = drips() + churning() + spray() + wash() + bubble_clusters() + blips() + air_pockets() + lone_bubbles()
    return yard() + plastic + water


def thin_treble(x, cut_db):
    lead = 411
    sum_difference = np.pad([x[0] + x[1], x[0] - x[1]], ((0, 0), (lead, 0)))
    hz, _, cells = signal.stft(sum_difference, SR, window="cosine", nperseg=2048)
    power = np.abs(cells) ** 2 + 1e-18
    patch = uniform_filter1d(uniform_filter1d(power, size=5, axis=1), size=2, axis=2)
    patch_db = 10 * np.log10(patch)
    threshold_db = np.interp(hz, *np.transpose(THINNING), left=-99)[:, None]
    weak = patch_db - uniform_filter1d(patch_db, size=70, axis=1) < threshold_db
    treble = power[:, 100:].sum(axis=(0, 1))
    sudden = np.roll(treble, -1) > 6 * np.roll(treble, 1)
    sway = uniform_filter1d(rng.standard_normal(len(treble)), size=3) * np.sqrt(3)
    weak = weak | (hz[:, None] > 15350 + 330 * sway)
    kept = cells * np.where(weak & ~sudden, convert_level_to_amplitude(cut_db), 1)
    both, apart = signal.istft(kept, SR, window="cosine", nperseg=2048)[1][:, lead:lead + N]
    return np.array([both + apart, both - apart]) / 2


def roll_off(x):
    return signal.sosfilt(signal.butter(12, 15700, fs=SR, output="sos"), x)


def record(dry):
    ported = colour(dry, ports)
    overloaded = 1.615 * np.tanh(ported / 1.396)
    rounded = colour(overloaded, lambda hz: 1 / (1 + 43.0 / (1j * hz)) / (1 + (hz / 15800) ** 60))
    mix = np.clip(thin_treble(rounded, cut_db=-45), -1, 1)
    return roll_off(mix)


dry = scene()
out = record(dry)
to_wav(out)
```